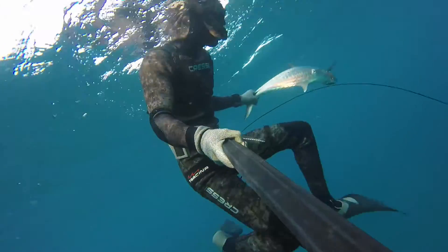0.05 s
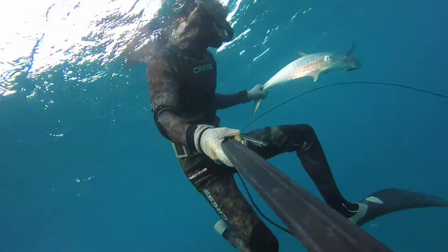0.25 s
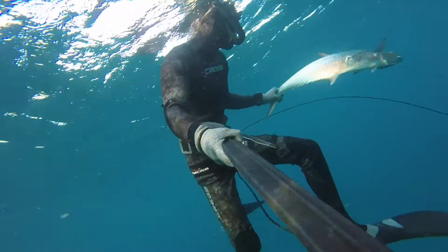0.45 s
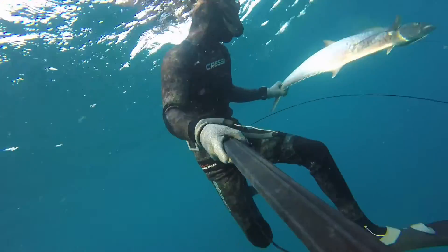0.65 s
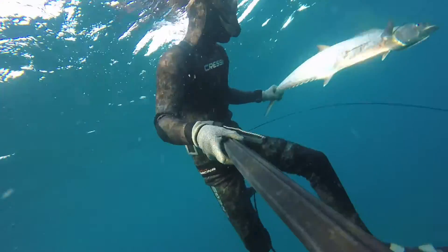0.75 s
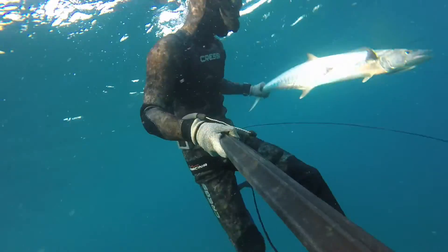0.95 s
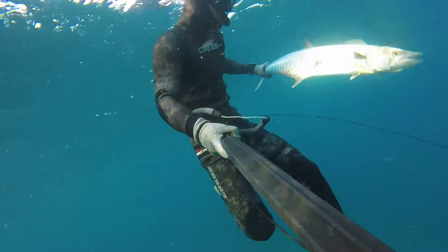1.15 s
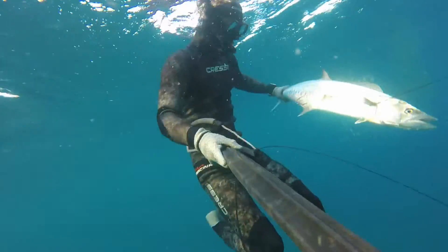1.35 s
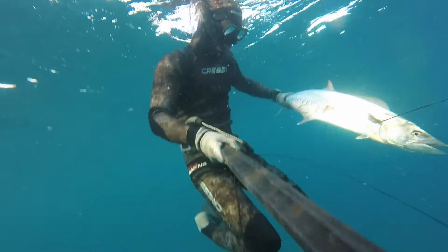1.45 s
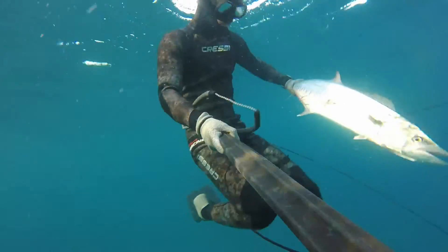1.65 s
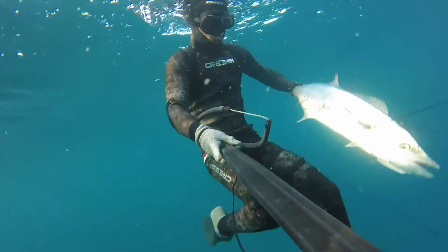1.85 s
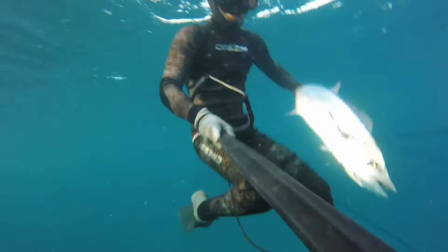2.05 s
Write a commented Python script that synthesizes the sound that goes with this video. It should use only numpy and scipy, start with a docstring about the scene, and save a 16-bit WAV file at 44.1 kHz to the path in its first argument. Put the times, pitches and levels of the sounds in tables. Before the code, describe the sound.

A speargun knocks and bumps as a diver handles it under water. Soft bumps lead to one sharp knock, then a quick cluster of thuds. A housed camera on the gun picks up low water rumble and faint crackle.

```python
"""Knocks on a speargun under water

A camera in a sealed housing rides on a speargun while a diver handles a caught fish.
Each knock excites damped modes: the barrel thuds, the whole gun sways and the housing clacks.
Hard contacts skid in a short crunch, and the gear bumps and ticks. Behind them the sea
crackles and hisses faintly, and the flow of water rumbles past the housing."""
import sys
import numpy as np
from scipy import signal
from scipy.fft import rfft, irfft, next_fast_len
from scipy.io import wavfile
from scipy.ndimage import map_coordinates

SR = 44100
rng = np.random.default_rng(int(sys.argv[2]) if len(sys.argv) > 2 else 0)


def dump(signal):
    """Clip the signal to [-1, 1] and save it as 16-bit WAV at the path in sys.argv[1]."""
    limited = np.clip(np.atleast_2d(signal).T, -1, 1)
    pcm = np.round(limited * 32767).astype(np.int16)
    wavfile.write(sys.argv[1], SR, pcm)


N = 92301
T = np.arange(int(.7 * SR)) / SR  # time since the onset of one event, t/s

# bending modes of the barrel: f/Hz, level/dB, t60/s
BARREL_MODES = [(75.3, -10.5, 0.21), (107.3, -7.5, 0.088), (140.4, -8, 0.078), (170.7, -15.5, 0.081),
                (207, -2.5, 0.036), (291, -8, 0.044), (413, -14.5, 0.045)]
# modes of the housing: f/Hz, level/dB, t60/s
HOUSING_MODES = [(605, -24, 0.036), (846, -3.5, 0.013), (1012, -1, 0.016), (1300, -12, 0.02),
                 (1637, -7.5, .017)]
# blows on the gun: t/s, side (+1 or -1), thud/dB, contact time/s, sway/dB, clack/dB, clack pitch ratio
KNOCKS = [(0.4466, 1, -27.5, 0.0026, -30, -24.5, 1.08), (1.0081, -1, 1.5, 0.0031, -5, -11, 1),
          (1.3887, 1, -2.5, 0.0038, -13, -10, 1.08), (1.4644, 1, -5.5, 0.0038, -14.5, -16.5, 1),
          (1.5431, 1, -15.5, 0.0038, -57, -34.5, 1.1), (1.5802, 1, -9.5, 0.0037, -17.5, -25, 0.97),
          (1.6424, -1, -2, 0.0037, -9, -17.5, 0.965)]
def knocks():
    """Modal superposition: each blow bends the barrel, swings the gun and rings the housing."""
    out = np.zeros(N)
    barrel = sum(amp(db - 60 * T / t60) * sine(hz) for hz, db, t60 in BARREL_MODES)
    sway = fade(t60=0.49, rise=0.0013) * sine(hz=27.47)
    for t, side, thud_db, contact, sway_db, clack_db, pitch in KNOCKS:
        force = np.sin(np.pi * np.minimum(T / contact, 1))  # half sine: longer contact, duller thud
        thud = signal.fftconvolve(barrel, force / force.sum())[:len(T)]
        clack = sum((-1) ** k * amp(db + rng.normal(0, 1)) * fade(t60, rise=0.00041) * sine(hz * pitch)
                    for k, (hz, db, t60) in enumerate(HOUSING_MODES))
        add(out, t, side * (amp(thud_db) * thud - amp(sway_db) * sway + amp(clack_db) * clack))
    return out


# soft contacts of glove and gear with the barrel: t/s, level/dB, f/Hz, rise/s, t60/s
BUMPS = [(0.035, -4, 85, 0.01, 0.089), (0.068, -5, 86, 0.024, 0.12), (0.030, -24.5, 209, 0.0017, 0.071),
         (0.163, -24.5, 36, 0.014, 0.6), (0.423, -27, 32, 0.017, 0.18), (0.445, -35.5, 166, 0.0067, 0.16),
         (0.851, -12.5, 150, 0.009, 0.069), (0.878, -23, 122, 0.0035, .14), (0.958, -18, 135, 0.0058, 0.15),
         (1.028, -2, 89.3, 0.0031, 0.1), (1.358, -4, 95, 0.01, 0.056), (1.371, -4.5, 150, 0.0033, 0.039),
         (1.407, -2, 71.4, 0.0017, 0.035), (1.541, -32, 378, 0.0017, 0.31), (1.6, -15, 150, 0.0052, 0.2),
         (1.888, -20, 125, 0.0024, 0.018), (1.922, -15, 29, 0.016, 0.33), (1.934, -32.5, 139, 0.01, 0.28)]
def bumps():
    """Damped oscillation: a soft contact builds up slowly and sounds one low, dull resonance."""
    out = np.zeros(N)
    for t, db, hz, rise, t60 in BUMPS:
        add(out, t, amp(db) * resonance(hz, t60, rise, jitter_rad=0.4, jitter_per_s=90))
    return out


# upper modes of the housing: f/Hz, level/dB, t60/s
HOUSING_UPPER_MODES = [(1274, -1, 0.0097), (1955, -16, 0.012), (2345, 1, 0.015), (2563, -1, 0.015),
                       (3420, -9, 0.0063), (3550, -11, 0.014), (4150, -8.5, 0.011), (4790, -11, 0.017),
                       (6630, -35.5, 0.011), (7600, -26, 0.0067), (9100, -15, 0.01)]
# spectrum of the friction noise: f/Hz, relative level/dB
GRIT_SPECTRUM = [(300, -26), (800, -14), (1200, -3), (1850, 1), (2080, -5), (2450, 0), (2900, -3),
                 (3900, -3), (5200, -13), (7000, -12), (9200, -11), (10200, -20), (11800, -14),
                 (15500, -29)]
# hard contacts that skid: t/s, grit/dB, ring/dB, duration/s, low-pass cutoff/Hz
CRUNCHES = [(0.0470, -40, -39, .002, 8640), (1.009, -15.5, -12.5, 0.0015, 10000),
            (1.0121, -25.5, -38, 0.0031, 8600), (1.0164, -46.5, -50, 0.019, 4030),
            (1.0483, -37, -34, 0.0013, 6000), (1.051, -37, -48, 0.0015, 8000),
            (1.3893, -25.5, -29, 0.0031, 2500), (1.393, -21.5, -20.5, 0.0014, 3300),
            (1.4015, -40, -31, 0.0026, 3080), (1.4623, -62, -62, 0.0012, 2200),
            (1.6445, -28, -29, 0.0017, 4260), (1.6482, -26, -25, 0.0014, 7200),
            (1.6526, -33.5, -57, 0.0027, 8340), (1.6545, -41, -59, 0.0061, 7000),
            (1.964, -29.5, -27.5, 0.0016, 11500)]
def crunches():
    """Impact and sliding friction: hard parts ring the housing's upper modes and skid in a burst of tiny
    contacts."""
    grit, rings = np.zeros(N), np.zeros(N)
    ring = sum((-1) ** k * amp(db) * fade(t60, rise=0.00016) * sine(hz)
               for k, (hz, db, t60) in enumerate(HOUSING_UPPER_MODES))
    for t, grit_db, ring_db, duration, cutoff_hz in CRUNCHES:
        noise = rng.standard_normal(len(T))
        grain_sizes = np.exp(0.47 * rng.standard_normal(len(T)))
        envelope = (1 - np.exp(-T / 0.0012)) * np.exp(-(T / duration) ** 2)
        burst = noise * grain_sizes * envelope
        burst *= np.sqrt(duration * SR) / np.linalg.norm(burst)  # energy proportional to duration
        lowpass = signal.butter(2, cutoff_hz, fs=SR)
        add(grit, t, amp(grit_db) * signal.lfilter(*lowpass, burst))
        add(rings, t, amp(ring_db) * signal.lfilter(*lowpass, ring))
    return coloured(grit, GRIT_SPECTRUM) + rings


# light contacts of line and fittings: t/s, level/dB, f/Hz, t60/s
TICKS = [(0.049, -26.5, 2570, 0.0073), (0.0576, -29.5, 1825, 0.026), (0.1465, -26, 3040, 0.014),
         (0.1455, -32.5, 1655, .018), (0.254, -37, 2530, 0.01), (0.3134, -35.5, 2420, 0.023),
         (0.366, -40.5, 2490, 0.026), (0.4500, -32.5, 1104, 0.024), (0.4475, -35.5, 456, 0.049),
         (0.5467, -54, 1040, 0.017), (0.5552, -33, 1068, 0.034), (0.661, -39, 2910, 0.013),
         (0.6790, -37, 3220, 0.0095), (0.708, -39, 1070, 0.027), (1.0340, -33.5, 5900, 0.0076),
         (1.1117, -38, 2440, 0.0096), (1.1624, -42, 1630, 0.023), (1.2181, -36.5, 2450, 0.02),
         (1.4434, -43.5, 2500, 0.01), (1.6053, -33, 1060, 0.024), (1.6307, -31, 1180, 0.033),
         (1.7321, -45, 3020, 0.023), (1.7606, -39, 3060, 0.013), (1.9365, -40, 2550, 0.022),
         (1.9637, -36, 1810, 0.021), (1.963, -23, 3210, 0.007), (1.9747, -34, 3170, 0.018)]
def ticks():
    """Free vibration: a small part, lightly struck, rings briefly at one rough pitch."""
    out = np.zeros(N)
    for t, db, hz, t60 in TICKS:
        add(out, t, amp(db) * resonance(hz, t60, rise=0.0005, jitter_rad=0.51, jitter_per_s=1220))
    return out


# spectrum of a snap: f/Hz, relative level/dB
SNAP_SPECTRUM = [(800, -7), (1600, 6.5), (3000, 4.5), (5000, -7), (8300, -2), (10500, -14), (13500, -19),
                 (16000, -40)]
# near snaps in the water: t/s, level/dB, t60/s
SNAPS = [(0.2534, -37.5, 0.0074), (0.3422, -35.5, 0.0056), (0.3677, -45, 0.0063), (0.577, -41, 0.0059),
         (0.7340, -40.5, 0.0081), (0.9900, -41, 0.0079), (1.111, -49, .007), (1.16, -40, .008),
         (1.2190, -44.5, 0.014), (1.2420, -37.5, 0.0074), (1.7020, -45.5, 0.0083), (1.731, -51.5, 0.0067),
         (1.7594, -52, 0.0033), (1.7898, -42.5, 0.0091), (2.0140, -39, .008)]
def crackle(far_per_s=110, far_db=-65, far_t60=0.016):
    """Shot noise: many faint, far snaps arrive at random beneath a few near ones."""
    near = np.zeros(N)
    for t, db, t60 in SNAPS:
        add(near, t, amp(db - 60 * T / t60) * rng.standard_normal(len(T)))
    arrivals = rng.random(N) < far_per_s / SR
    sizes = amp(-np.minimum(rng.standard_normal(N), 2))  # about 1 dB of spread
    envelope = signal.fftconvolve(arrivals * sizes, amp(-60 * T / far_t60))[:N]
    far = unit(envelope * rng.standard_normal(N))
    return coloured(near + amp(far_db) * far, SNAP_SPECTRUM)


# spectrum of the flow noise: f/Hz, relative level/dB
FLOW_SPECTRUM = [(15, 7), (30, 4.5), (60, 0), (100, -6.5), (170, -15.5), (260, -25.5), (400, -30.5),
                 (700, -41.5), (1500, -76)]
# envelope of the flow noise: t/s, relative level/dB
FLOW_LEVEL = [(0, -29.5), (.12, -34), (.24, -34.5), (.45, -34), (.62, -34), (.8, -40), (.93, -31.5),
              (1.05, -29), (1.18, -33.5), (1.31, -36.5), (1.4, -19.5), (1.76, -33), (1.86, -43),
              (1.97, -30), (2.09, -42)]
def flow_rumble(gain_db=-0.5):
    """Flow noise: water passing the housing makes a low rumble that swells and ebbs."""
    rumble = filtered(rng.standard_normal(N), lambda hz: amp(along(FLOW_SPECTRUM, hz)))
    return unit(rumble) * amp(curve(FLOW_LEVEL) + gain_db)


# spectrum of the sea's hiss: f/Hz, relative level/dB
HISS_SPECTRUM = [(150, 8.5), (380, 5.5), (650, 3), (1100, 2), (1450, 1), (2000, -2), (3100, -0.5),
                 (4200, -7.5), (5400, -11), (7000, -14.5), (8500, -11), (10500, -23), (13300, -25),
                 (16000, -42)]
# resonances of the housing: f/Hz, width/Hz, boost/dB
HOUSING_PEAKS = [(1036, 200, 3), (1670, 290, 5), (2440, 190, 6.5), (3140, 260, 3.5)]
# envelope of the hiss: t/s, level/dB
HISS_LEVEL = [(0, -55.5), (.35, -57), (.8, -56), (1.0, -56.5), (1.25, -56.5), (1.45, -60), (1.56, -61),
              (1.72, -59), (1.87, -61), (1.96, -53.5), (2.09, -52)]
def sea_hiss():
    """Resonant transmission: the housing colours the broadband hiss of the sea."""
    def response(hz):
        peaks_db = sum(db / (1 + (2 * (hz - f) / width) ** 2) for f, width, db in HOUSING_PEAKS)
        return amp(along(HISS_SPECTRUM, hz) + peaks_db)
    hiss = unit(filtered(rng.standard_normal(N), response))
    flicker_db = wobble(per_s=73, size=N)
    return hiss * amp(curve(HISS_LEVEL) + flicker_db)


def amp(db):
    """Decibels to amplitude ratio."""
    return 10 ** (np.asarray(db) / 20)


def unit(x):
    """Normalisation to rms 1."""
    return x / np.sqrt(np.mean(x ** 2) + 1e-20)


def along(points, hz):
    """Interpolation of (f/Hz, level/dB) points on a logarithmic frequency axis."""
    f, db = np.transpose(points)
    return np.interp(np.log(hz + 1), np.log(f + 1), db)


def curve(points):
    """Linear interpolation of (t/s, level/dB) points over the scene."""
    return np.interp(np.arange(N) / SR, *np.transpose(points))


def wobble(per_s, size):
    """Smooth random fluctuation: a spline through per_s Gaussian values a second."""
    return map_coordinates(rng.standard_normal(2048), [np.arange(size) * per_s / SR], mode="mirror")


def sine(hz, phase=0):
    """Simple harmonic motion."""
    return np.sin(2 * np.pi * hz * T + phase)


def fade(t60, rise):
    """Exponential decay of 60 dB in t60 seconds, with an onset of time constant rise."""
    return np.exp(-np.log(1000) * T / t60) * (1 - np.exp(-T / rise))


def resonance(hz, t60, rise, jitter_rad, jitter_per_s):
    """Random phase modulation gives one damped mode an unsteady pitch."""
    return fade(t60, rise) * sine(hz, jitter_rad * wobble(jitter_per_s, len(T)))


def add(track, t, sound):
    """Superposition of a sound on the track, starting at t seconds."""
    start = max(round(t * SR), 0)
    part = sound[:max(N - start, 0)]
    track[start:start + len(part)] += part


def filtered(x, response):
    """Zero-phase filtering: the spectrum is multiplied by response(hz)."""
    size = next_fast_len(N + SR // 2)
    return irfft(rfft(x, size) * response(np.fft.rfftfreq(size, 1 / SR)), size)[:N]


def coloured(x, spectrum, size=4096):
    """Minimum-phase filtering with a unit-energy impulse response: nothing sounds before an onset."""
    hz = np.fft.rfftfreq(size, 1 / SR)
    cepstrum = irfft(np.log(amp(along(spectrum, hz))))
    cepstrum[1:size // 2] *= 2  # fold onto positive time
    cepstrum[size // 2 + 1:] = 0
    impulse_response = irfft(np.exp(rfft(cepstrum)))
    return signal.fftconvolve(x, impulse_response / np.linalg.norm(impulse_response))[:N]


def scene():
    """Linear superposition: all sources sum at one microphone."""
    background = flow_rumble() + sea_hiss() + crackle()
    return (background + knocks() + crunches() + bumps() + ticks())[None]


def record(dry):
    """Saturation and band limiting: the camera rounds the highest peaks and cuts off at 16 kHz."""
    rounded = dry[0] / (1 + np.abs(dry[0]) ** 8) ** (1 / 8)
    return filtered(rounded, lambda hz: hz < 16000)[None]


dry = scene()
out = record(dry)
dump(out)
```